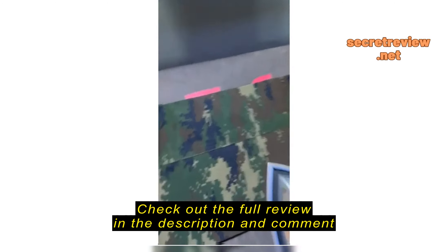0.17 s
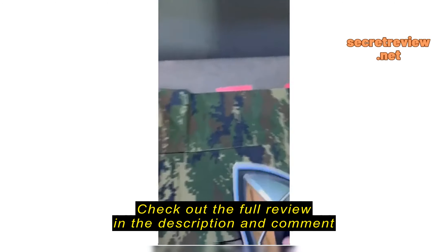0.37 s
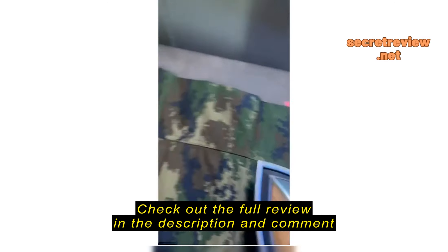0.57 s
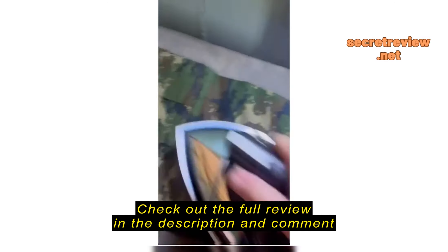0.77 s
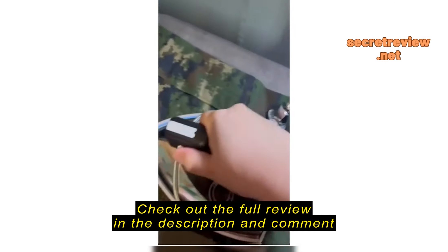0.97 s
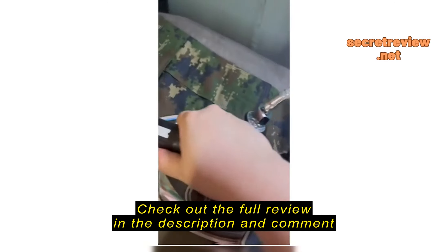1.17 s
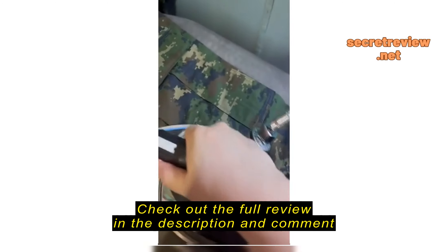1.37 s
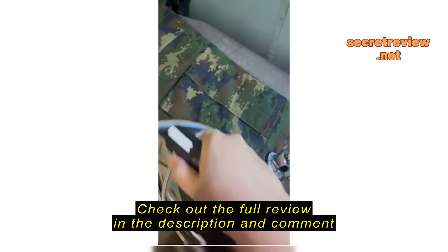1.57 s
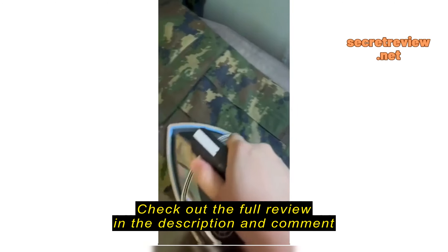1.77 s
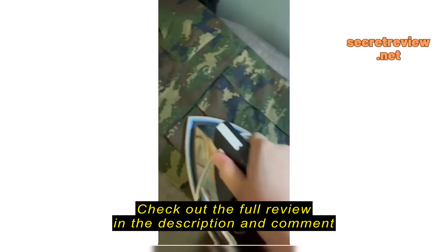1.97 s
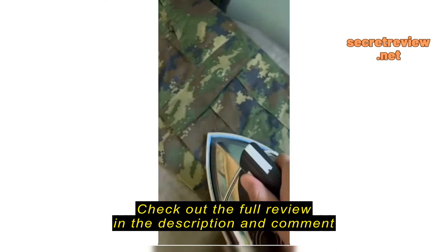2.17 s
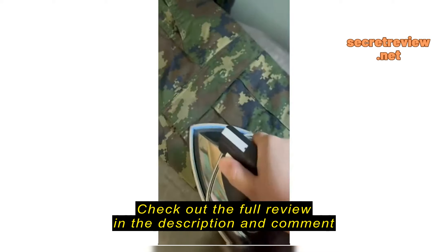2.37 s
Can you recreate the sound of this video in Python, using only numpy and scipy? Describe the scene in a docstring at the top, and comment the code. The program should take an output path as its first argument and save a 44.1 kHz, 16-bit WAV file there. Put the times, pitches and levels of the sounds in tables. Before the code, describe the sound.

Close by in a small rumbling room, an iron's button snaps and steam hisses unevenly over fabric. Another sharp click and bumps come midway, then a short lull and a stronger rush of steam.

```python
"""A small room hums and rumbles throughout while a steam iron is worked over cloth on a padded board.
First its steam button clicks and rattles, then noise shaped into three bands of steam hisses out.
The hiss swells or is muffled as the iron moves; low pushes thud and grainy noise scuffs on the board,
with more clicks along the way. The steam sinks for a moment near 1.75 s, then swells to its loudest;
a soft low tone is heard from 2.1 s."""
import sys
import numpy as np
from scipy import signal
from scipy.fft import rfft, irfft
from scipy.io import wavfile
from scipy.ndimage import uniform_filter1d

SR = 44100
rng = np.random.default_rng(int(sys.argv[2]) if len(sys.argv) > 2 else 0)


def materialize(psi):
    """Save the field psi as 16-bit PCM at rate SR to the path in sys.argv[1].

    A 1-D psi becomes a single channel; in a 2-D psi each row is a channel.
    """
    bounded = np.clip(np.atleast_2d(psi).T, -1, 1)
    quanta = np.round(bounded * 32767).astype(np.int16)
    wavfile.write(sys.argv[1], SR, quanta)


N = 106457  # length in samples


def amp(db):
    """Turn decibels into a plain multiplier."""
    return 10 ** (np.asarray(db) / 20)


def evened(x):
    """Scale to an average strength (rms) of 1."""
    return x / np.sqrt(np.mean(x ** 2) + 1e-20)


def read(points, hz):
    """Read a spectrum table at any pitch, in straight lines over log frequency."""
    f, value = np.transpose(points)
    return np.interp(np.log(hz + 1), np.log(f + 1), value)


def curve(points, column):
    """One column of a time table at every sample."""
    columns = np.transpose(points)
    return np.interp(np.arange(N) / SR, columns[0], columns[column])


def add(mix, start_s, sound):
    """Add a sound into the mix, cut off where the mix ends."""
    part = mix[..., round(start_s * SR):][..., :sound.shape[-1]]
    part += sound[..., :part.shape[-1]]


def soft_start(t, rise_s):
    """A smooth climb from 0 towards 1."""
    return 1 - np.exp(-(t / rise_s) ** 2)


# Stereo width of every noise: f/Hz, level/dB (side minus mid)
NOISE_WIDTH = [(60, -45), (300, -19.5), (560, -8), (900, -6), (2100, -24.5), (2800, -5.5), (3900, -31),
               (4200, -3.5), (5200, 0), (6400, -10.5), (7600, -23)]


def noise(spectrum, patchy_db, flicker_db, size, count):
    """Stereo noise from random short spectra: narrow patches lasting count frames, and a shared flicker."""
    hop = size // 4
    hz = np.fft.rfftfreq(size, 1 / SR)
    draws = rng.standard_normal((N // hop + 5, len(hz), 5))
    a, b, c, d, patches = draws.T  # each is frequency by time
    flicker = evened(uniform_filter1d(patches[0], size=3))
    patches = uniform_filter1d(patches, size=3, axis=0)
    patches = evened(uniform_filter1d(patches, size=count, axis=1))
    mid = a + 1j * b
    side = (c + 1j * d) * amp(read(NOISE_WIDTH, hz))[:, None]
    level_db = read(spectrum, hz)[:, None] + patchy_db * patches + flicker_db * flicker
    frames = np.array([mid + side, mid - side]) * amp(level_db)
    out = signal.istft(frames, nperseg=size, noverlap=size - hop)[1][:, :N]
    return out / np.sqrt(np.mean(out.mean(0) ** 2))  # mid has rms 1


def ring(modes, pitch, rise_s):
    """Dying modes set going by a short snap, peak 1; pitch multiplies the first column."""
    t = np.arange(3000) / SR
    out = np.zeros(len(t))
    for factor, db, t60 in modes:
        out += amp(db - 60 * t / t60) * np.sin(2 * np.pi * pitch * factor * t)
    out *= soft_start(t, rise_s)
    return out / abs(out).max()


# Room rumble spectrum: f/Hz, relative level/dB (per Hz)
RUMBLE_SPECTRUM = [(28, -29.5), (45, -7.5), (70, 0.5), (110, -5.5), (210, -12.5), (540, -22.5),
                   (1100, -28.5), (4600, -51.5), (6700, -36), (7550, -40), (7700, -100)]
# Mains hum tones: f/Hz, level/dB (rms)
HUM_TONES = [(49, -57), (100.5, -53), (200, -64), (300, -66)]
RUMBLE_DB, HUM_WIDTH_HZ = -49.5, 3.9  # the width sets how far the hum wanders


def room():
    """Lumpy rumble with mains hum whose phase wanders at random, so it wavers."""
    t = np.arange(N) / SR
    hum = np.zeros(N)
    for hz, db in HUM_TONES:
        drift = np.cumsum(rng.standard_normal(N)) * np.sqrt(2 * np.pi * HUM_WIDTH_HZ / SR)
        drift = uniform_filter1d(drift, size=2000)
        hum += np.sqrt(2) * amp(db) * np.sin(2 * np.pi * hz * t + drift)
    rumble = noise(RUMBLE_SPECTRUM, patchy_db=1.0, flicker_db=3.5, size=2048, count=2)
    return hum + amp(RUMBLE_DB) * rumble


# Low soft tone: t/s, f/Hz, level/dB (rms)
MOAN_PATH = [(2.1, 175.4, -52.5), (2.2, 193, -48), (2.24, 196, -51), (2.29, 186, -59.5)]


def moan():
    """One soft sine tone that glides up, then dips a little as it fades."""
    t = np.arange(N) / SR
    on = (t > MOAN_PATH[0][0]) & (t < MOAN_PATH[-1][0])
    tone = np.sin(2 * np.pi * np.cumsum(curve(MOAN_PATH, column=1)) / SR)
    return on * np.sqrt(2) * amp(curve(MOAN_PATH, column=2)) * tone


# Sole plate scuffing the cloth: t/s, level/dB, t60/s (time to die by 60 dB),
# board pitch (factor), treble over the rest (level/dB)
SCUFF_EVENTS = [(.186, -39, 0.092, 1.1, -3.5), (0.709, -41.5, 0.095, .92, 3.5),
                (1.086, -37, 0.086, 1.01, 1.5), (1.651, -38.5, 0.13, 1.124, -5.5),
                (1.664, -41.5, 0.32, 0.87, -24)]
# Rubbing noise: f/Hz, relative level/dB (per Hz)
SCUFF_SPECTRUM = [(250, -22), (420, -6), (620, -6), (900, -5.5), (1400, -11.5), (3000, -8), (5500, -61)]
# Ringing of the board: f/Hz before the scuff's pitch factor, relative level/dB, t60/s
BOARD_MODES = [(421, -3, 0.095), (658, 0.5, 0.059), (756, 2.5, 0.037)]
KNOCK_DB, KNOCK_RISE_S, SCUFF_SPLIT_HZ = 2, 0.0017, 1360  # knock level is relative to the scuff


def scuffs():
    """The board rings shortly as grainy dull noise dies away, some rubs brighter than others."""
    dull_level, treble_level, knocks = np.zeros(N), np.zeros(N), np.zeros(N)
    t = np.arange(9000) / SR
    rise = soft_start(t, KNOCK_RISE_S)
    for s, db, t60, pitch, treble_db in SCUFF_EVENTS:
        add(dull_level, s, rise * amp(db - 60 * t / t60))
        add(treble_level, s, rise * amp(db + treble_db - 60 * t / t60))
        add(knocks, s, amp(db + KNOCK_DB) * ring(BOARD_MODES, pitch, KNOCK_RISE_S))
    rub = noise(SCUFF_SPECTRUM, patchy_db=-0.5, flicker_db=2.5, size=512, count=2)
    dull = signal.lfilter(*signal.butter(2, SCUFF_SPLIT_HZ, fs=SR), rub)
    treble = signal.lfilter(*signal.butter(2, SCUFF_SPLIT_HZ, "high", fs=SR), rub)
    # minus: the two filters are in opposite phase where they meet
    return knocks + dull_level * dull - treble_level * treble


# Iron meeting the padded board: t/s, peak level/dB, f/Hz
THUD_EVENTS = [(0.307, -38, 108), (0.707, -37.5, 110), (0.9789, -22.5, 126), (0.9943, -26.5, 129),
               (1.009, -29.5, 121), (1.156, -30.5, 102), (1.36, -36, 58.5), (1.692, -34.5, 88),
               (2.011, -26.5, 129.5), (2.038, -34.5, 72), (2.06, -33, 93)]
THUD_RISE_CYCLES, THUD_TAIL_CYCLES = 0.5, 0.66
THUD_SAG, THUD_PHASE = 0.15, 0.3  # sag per cycle, phase in radians


def thuds():
    """Each a low push of a cycle or two that sags in pitch and dies slower than it rises."""
    out = np.zeros(N)
    t = np.arange(-1500, 2500) / SR
    for s, db, hz in THUD_EVENTS:
        turns = t * hz
        cycles = np.where(t < 0, THUD_RISE_CYCLES, THUD_TAIL_CYCLES)
        shape = np.exp(-(turns / cycles) ** 2)
        push = np.cos(2 * np.pi * turns * np.exp(-THUD_SAG * turns) + THUD_PHASE)
        add(out, s + t[0], amp(db) * shape * push)
    return out


# Rattle of the button: t/s, level/dB, rise/s, t60/s
RATTLE_EVENTS = [(0.068, -54.5, 0.0035, 0.082), (0.183, -36.5, .004, 0.097), (0.202, -36, .003, 0.046),
                 (1.081, -34.5, 0.0022, 0.092), (1.09, -28.5, 0.0016, .045), (1.099, -34.5, 0.002, 0.053)]
# Rattle noise: f/Hz, relative level/dB (per Hz)
RATTLE_SPECTRUM = [(900, -14), (2800, -4), (4200, -10.5), (5500, -4), (8000, -15.5)]


def rattles():
    """Loose parts of the button shiver around the clicks: short bursts of broad noise."""
    level = np.zeros(N)
    t = np.arange(6000) / SR
    for s, db, rise_s, t60 in RATTLE_EVENTS:
        add(level, s, soft_start(t, rise_s) * amp(db - 60 * t / t60))
    return level * noise(RATTLE_SPECTRUM, patchy_db=6.0, flicker_db=0.0, size=256, count=3)


# Button clicks: t/s, hollow housing level/dB, bright spring level/dB, spring f/Hz, rise/s
CLICK_EVENTS = [(0.0674, -58, -40, 6730, 0.0018), (0.069, -72, -47, 2050, .0015),
                (0.1917, -65, -26.5, 5800, 0.00066), (0.1931, -17, -24, 5250, 0.0012),
                (0.7111, -39, -35, 3700, 0.00036), (1.0897, -14.5, -24, 4310, 0.00034),
                (1.0901, -28.5, -19, 6500, 0.00076)]
# Ringing of the housing: f/Hz before the 0.96 pitch factor below, relative level/dB, t60/s
HOUSING_MODES = [(1632, -15, 0.055), (2205, -8.5, 0.018), (2813, 21, 0.0045), (3175, 6, 0.0055)]
# Ringing of the spring: multiple of the spring's f/Hz, relative level/dB, t60/s
SPRING_MODES = [(.86, -8, .006), (1, 0, .006), (1.17, -5, .006), (1.4, -16, .007)]
# Stereo width of the spring: f/Hz, level/dB (side minus mid)
SPRING_WIDTH = [(3000, -8), (7900, 7)]
ECHO_DB, ECHO_T60_S, ECHO_TOP_HZ = -16, 0.13, 6300


def button():
    """Housing sounds in the middle, the spring wide; nearby surfaces add a short echo."""
    housing, spring = np.zeros(N), np.zeros(N)
    for s, housing_db, spring_db, hz, rise_s in CLICK_EVENTS:
        add(housing, s, -amp(housing_db) * ring(HOUSING_MODES, 0.96, rise_s))
        add(spring, s, amp(spring_db) * ring(SPRING_MODES, hz, rise_s))
    click = housing + spring
    t = np.arange(6000) / SR
    # the echo is dying noise that begins after 3 ms
    tail = rng.standard_normal((2, len(t))) * amp(-60 * t / ECHO_T60_S) * (t > .003)
    tail = signal.lfilter(*signal.butter(2, ECHO_TOP_HZ, fs=SR), tail)
    echo = signal.fftconvolve(click[None], tail / np.linalg.norm(tail[0]), axes=1)[:, :N]
    # 1j shifts the side by a quarter cycle
    width = amp(read(SPRING_WIDTH, np.fft.rfftfreq(N, 1 / SR)))
    side = irfft(1j * rfft(spring) * width, N)
    return click + np.array([side, -side]) + amp(ECHO_DB) * echo


# Steam flow: t/s, bright jet level/dB, middle hiss level/dB, dull hiss level/dB
STEAM_FLOW = [(.17, -86, -77, -74.5), (.19, -52, -50, -49), (.22, -55, -49.5, -52.5),
              (.36, -48.5, -51.5, -53.5), (.5, -52.5, -56, -54.5), (.65, -47, -50.5, -52),
              (.73, -46, -50, -51), (.96, -44.5, -50, -48.5), (1.07, -44, -47, -50.5),
              (1.12, -47.5, -46, -48.5), (1.24, -48.5, -53.5, -54), (1.37, -45.5, -48.5, -51.5),
              (1.47, -52.5, -52.5, -54), (1.62, -55.5, -58.5, -58.5), (1.69, -59, -53.5, -51),
              (1.73, -66, -67.5, -57), (1.78, -66.5, -71, -64.5), (1.82, -57.5, -58, -59.5),
              (1.87, -50.5, -53.5, -55), (2.05, -45, -51.5, -52.5), (2.2, -40.5, -47.5, -47.5),
              (2.31, -41.5, -49.5, -47.5), (2.36, -37, -43.5, -44.5), (2.41, -36, -43.5, -46)]
# Bright jet: f/Hz, relative level/dB (per Hz)
JET_SPECTRUM = [(4300, -29.5), (5000, -8), (6300, 1), (7450, 2), (7560, -10.5), (7650, -74)]
# Middle hiss: f/Hz, relative level/dB (per Hz)
MIDDLE_SPECTRUM = [(1800, -72), (2900, 1.5), (4000, 4), (4300, 1), (5000, -7.5), (6000, -54.5)]
# Dull hiss: f/Hz, relative level/dB (per Hz)
DULL_SPECTRUM = [(200, -5), (450, -0.5), (900, -2.5), (2200, -0.5), (2800, -0.5), (4000, -85)]


def steam():
    """A bright jet from the holes, a middle and a dull hiss through the cloth."""
    jet = noise(JET_SPECTRUM, patchy_db=3.5, flicker_db=1.0, size=512, count=14)
    middle = noise(MIDDLE_SPECTRUM, patchy_db=2.5, flicker_db=-1.25, size=512, count=14)
    dull = noise(DULL_SPECTRUM, patchy_db=3.5, flicker_db=0.38, size=1024, count=8)
    jet *= amp(curve(STEAM_FLOW, column=1))
    middle *= amp(curve(STEAM_FLOW, column=2))
    dull *= amp(curve(STEAM_FLOW, column=3))
    return jet + middle + dull


def scene():
    """All layers together, from the background to the steam."""
    return room() + moan() + scuffs() + thuds() + rattles() + button() + steam()


EDGE_HZ = 8689


def record(dry):
    """A steep low-pass filter takes away what lies above the edge."""
    lowpass = signal.firwin(511, EDGE_HZ, window=("kaiser", 9), fs=SR)
    return signal.oaconvolve(dry, lowpass[None], "same")


dry = scene()
out = record(dry)
materialize(out)
```